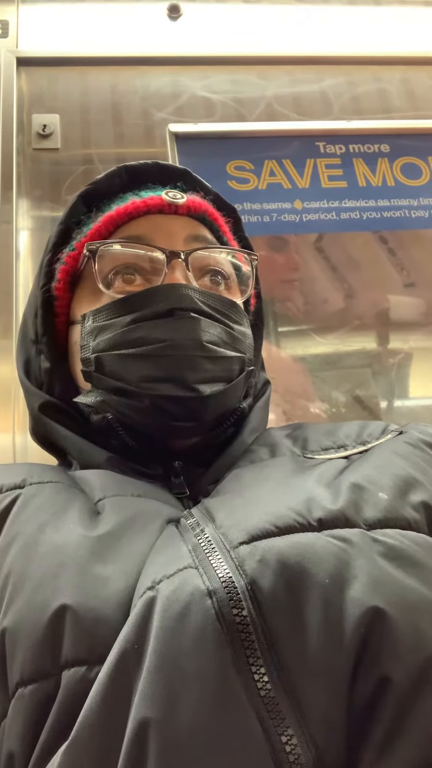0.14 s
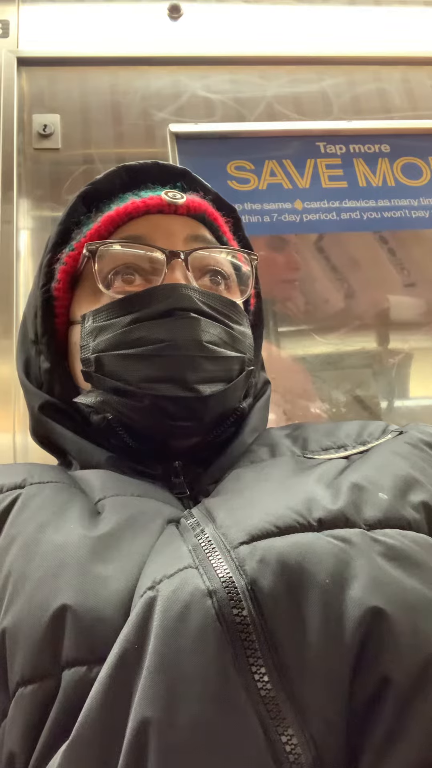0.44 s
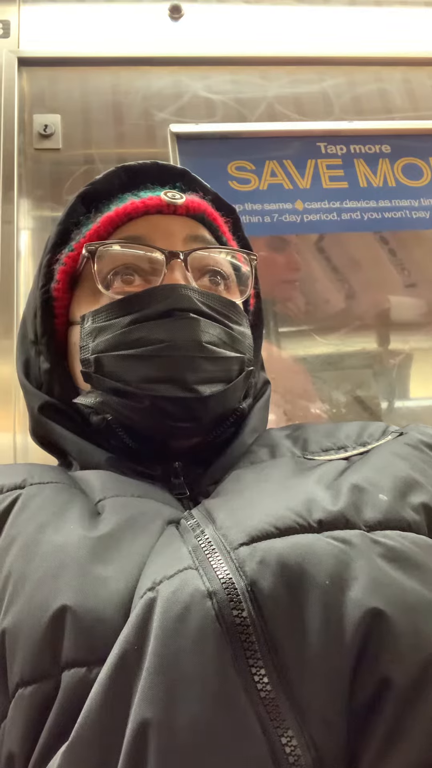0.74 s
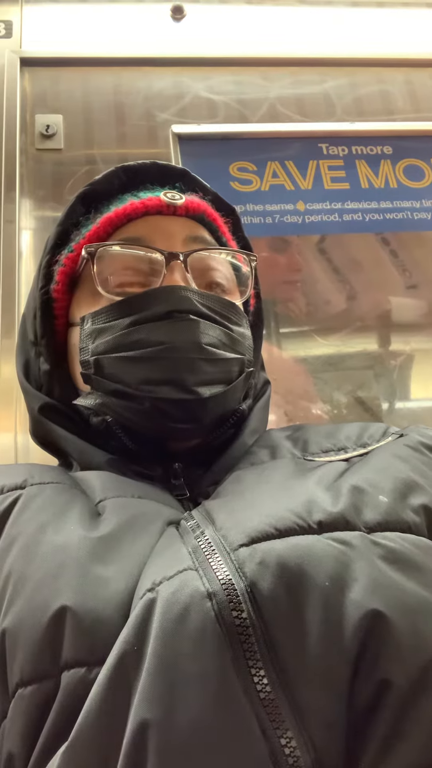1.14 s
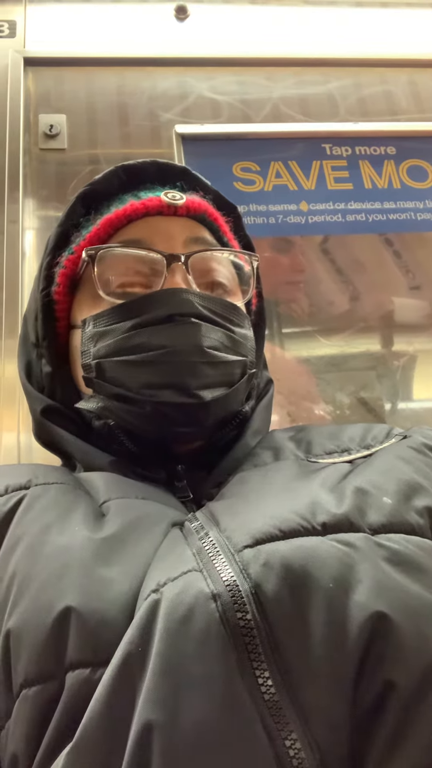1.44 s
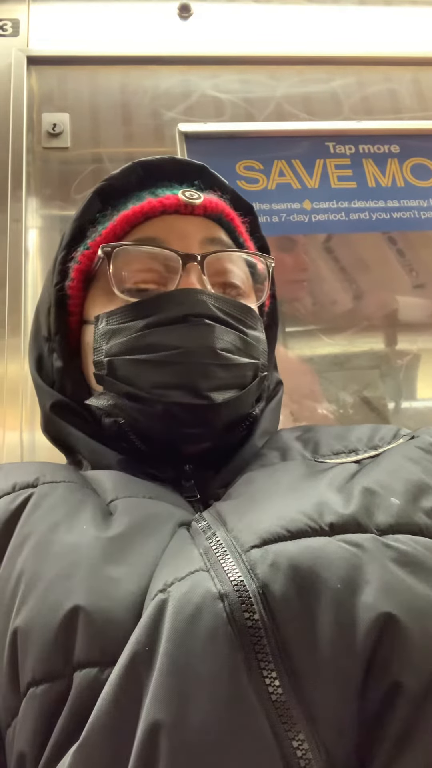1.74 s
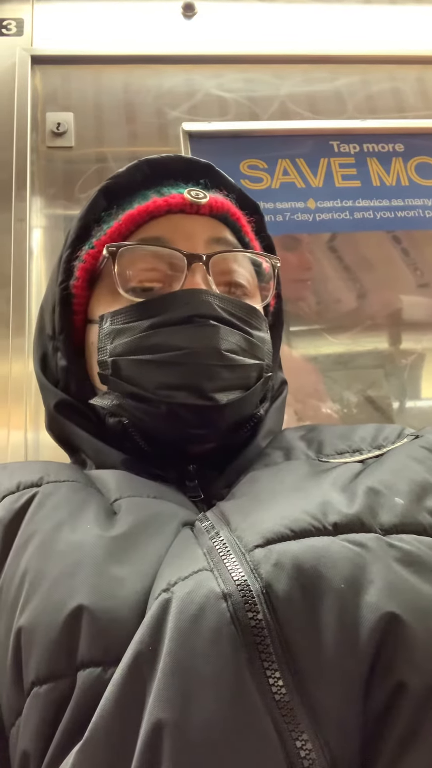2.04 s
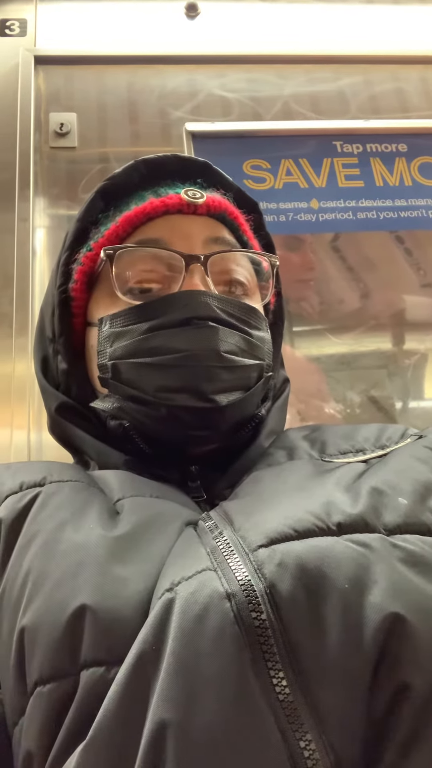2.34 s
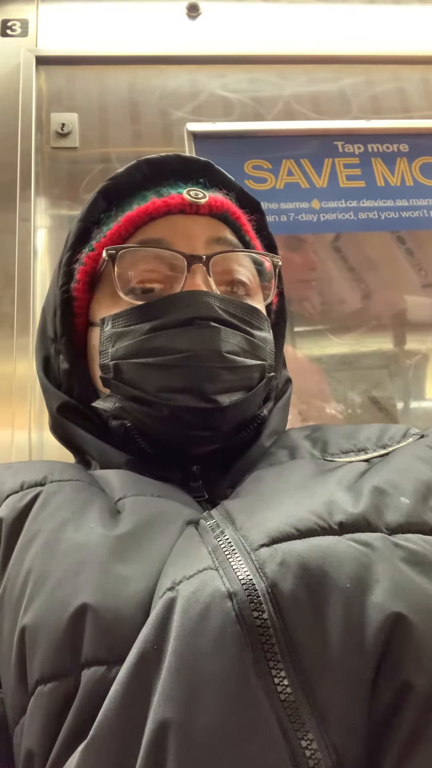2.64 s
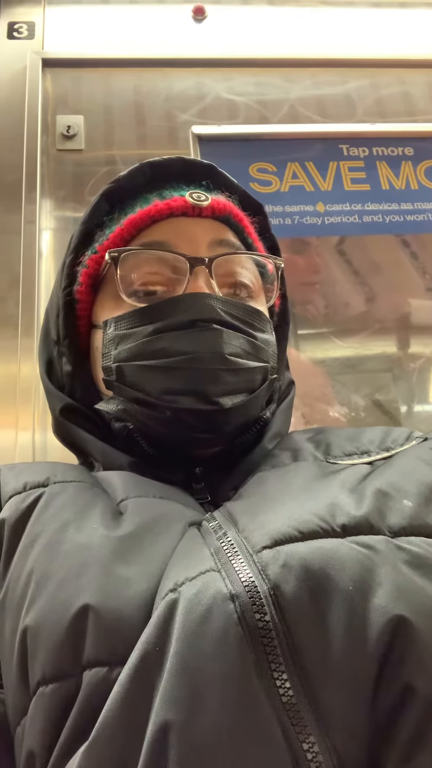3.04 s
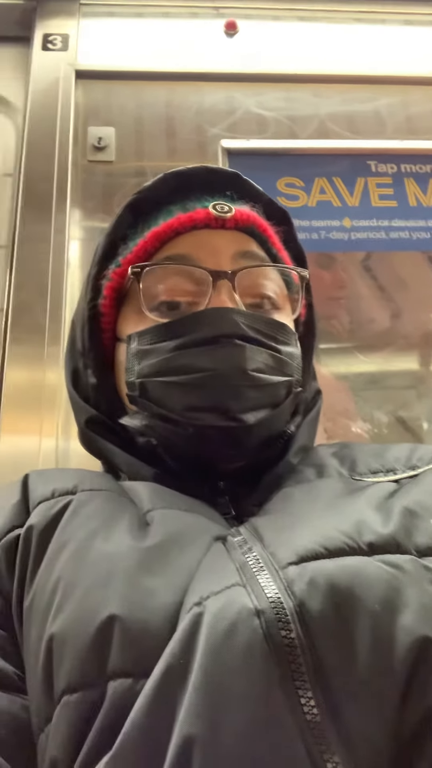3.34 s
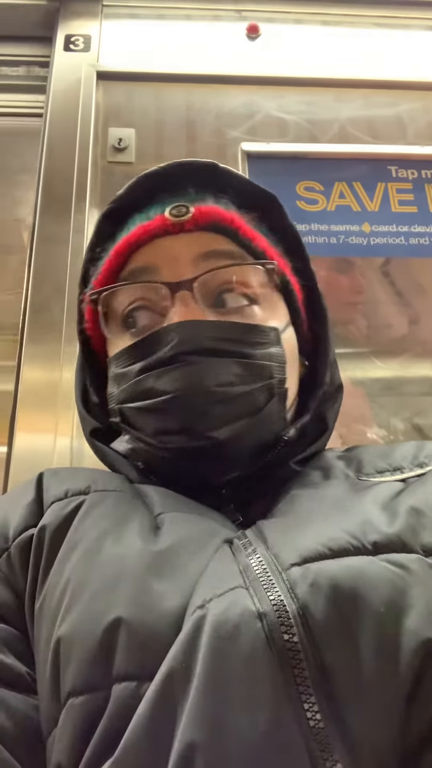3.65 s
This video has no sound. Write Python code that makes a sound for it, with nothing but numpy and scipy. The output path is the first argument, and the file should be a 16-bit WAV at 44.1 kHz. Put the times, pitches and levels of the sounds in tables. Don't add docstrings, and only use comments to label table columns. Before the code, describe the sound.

Inside a moving subway car, a phone picks up low rolling rumble, humming motor and thin whine, brief early squeals, then a sudden much louder rush with booming body blows and metallic knocks.

```python
import sys
import numpy as np
from scipy import signal
from scipy.fft import rfft, irfft, next_fast_len
from scipy.io import wavfile
from scipy.ndimage import uniform_filter1d

SR = 44100
rng = np.random.default_rng(int(sys.argv[2]) if len(sys.argv) > 2 else 0)


def volts(x):
    e = np.asarray(x, float) / 20
    return 10 ** e


def master(y):
    cut = np.clip(np.atleast_2d(y).T, -1, 1)
    pcm = np.round(cut * 32767)
    wavfile.write(sys.argv[1], SR, pcm.astype(np.int16))


N = 167580


def evened(x):
    return x / np.sqrt(np.mean(x ** 2) + 1e-20)


def read(points, hz):
    f, value = np.transpose(points)
    return np.interp(np.log(hz + 1), np.log(f + 1), value)


def curve(points):
    s, db = np.transpose(points)
    return volts(np.interp(np.arange(N) / SR, s, db, left=-140))


def add(mix, s, sound):
    part = mix[:, round(s * SR):][:, :sound.shape[-1]]
    part += sound[..., :part.shape[1]]


def slow(rate, lowest=0.326):
    t = np.arange(0, N + 64, 64) / SR
    wave = sum(np.sin(2 * np.pi * (f * t + rng.random())) / np.sqrt(f) for f in np.geomspace(lowest, rate, 16))
    return np.interp(np.arange(N) / SR, t, evened(wave))


def noise(spectrum, patch_db, size=1024):
    frames, hz = 4 * N // size + 5, np.fft.rfftfreq(size, 1 / SR)
    z = rng.standard_normal((frames, len(hz), 5)).T
    patches = uniform_filter1d(uniform_filter1d(z[4], size=14, axis=0), size=8, axis=1)
    colour = read(spectrum, hz) - 80 * (hz > 1.25 * spectrum[-1][0])
    z = (z[:2] + 1j * z[2:4]) * volts(colour[:, None] + patch_db * evened(patches))
    return evened(signal.istft(z, nperseg=size, noverlap=3 * size // 4)[1][:, :N])


def resonate(x, hz, width, passes=1):
    r = np.exp(-np.pi * width / SR)
    for _ in range(passes):
        x = 2 * signal.lfilter([1 - r], [1, -r * np.exp(2j * np.pi * hz / SR)], x).real
    return x


def ringing(push, modes):
    return sum(volts(db) * evened(resonate(push, hz, width)) for hz, width, db in modes)


def sine(turns):
    return np.sqrt(2) * np.sin(2 * np.pi * (turns + rng.random((2, 1))))


def rolling_rumble():
    # (time [s], level [dB])
    track_level = [(0, -32), (.5, -32.5), (.9, -32.5), (1.4, -32), (1.9, -32), (2.3, -33), (2.75, -32.5),
                   (3.8, -32)]
    # (frequency [Hz], density [dB per Hz])
    rumble_colour = [(25, -35.5), (60, 7.5), (95, -3), (200, -7), (800, -13.5), (1900, -21), (3000, -32.5),
                     (5200, -44)]
    swell = volts(0.53 * slow(11.0, 2.455))
    return curve(track_level) * swell * noise(rumble_colour, 1.5, size=2048)


def track_roar():
    # (time [s], level [dB])
    opening = [(2.92, -65), (2.95, -38), (3.1, -33.5), (3.16, -22), (3.24, -19.5), (3.31, -25.5),
               (3.42, -23), (3.6, -27.5), (3.73, -26), (3.8, -24.5)]
    # (frequency [Hz], density [dB per Hz])
    roar_colour = [(25, -40.5), (60, 9.5), (130, 3), (330, 1), (600, -9)]
    # (frequency [Hz], width [Hz], level [dB])
    body_modes = [(55, 8, -19.5), (100, 25, -13.5), (151, 14, -14), (220, 36, -4), (272, 21, -12.5),
                  (330.5, 45, -18)]
    roar = noise(roar_colour, 1.9)
    return curve(opening) * (roar + ringing(roar, body_modes))


def wheel_rush():
    # (time [s], level [dB])
    rush_level = [(2.91, -65), (2.93, -39), (3.121, -34), (3.127, -24.5), (3.16, -23), (3.29, -26.5),
                  (3.47, -27.5), (3.57, -30), (3.65, -28.5), (3.745, -30), (3.8, -22.5)]
    # (frequency [Hz], density [dB per Hz])
    rush_colour = [(250, -1.5), (600, 2), (1100, -1), (1800, -8.5), (3500, -19.5), (6000, -32.5)]
    # (frequency [Hz], width [Hz], level [dB])
    panel_modes = [(445, 18, -15), (604, 58, -12.5), (696, 13, -24), (784, 4.1, -17.5), (1050, 30, -24)]
    rush = noise(rush_colour, 1.2)
    flutter = volts(0.49 * slow(40, 8))
    return curve(rush_level) * flutter * (rush + ringing(rush, panel_modes))


def body_blows():
    # (time [s], first pitch [Hz], last pitch [Hz], level [dB], swell length [s])
    blows = [(1.297, 77.4, 76, -29.5, .12), (1.679, 55, 55, -31, .1), (1.706, 76.8, 81.6, -30.5, 0.081),
             (2.94, 189, 184, -36.5, 0.033), (3.01, 205, 205, -30, 0.05), (3.036, 276, 277, -29.5, 0.047),
             (3.079, 105.7, 100.3, -24, 0.038), (3.129, 78.5, 106, -14.5, 0.085),
             (3.183, 196, 194, -22, 0.037), (3.19, 333.7, 338, -22.5, 0.03), (3.236, 214, 229, -27, 0.028),
             (3.265, 110, 103, -18, .035), (3.264, 279, 275, -23, 0.038), (3.315, 274.4, 272, -17.5, 0.04),
             (3.318, 82, 77, -23, 0.053), (3.386, 107.7, 81.8, -17, 0.04), (3.455, 218, 228, -20.5, 0.031),
             (3.485, 152, 161, -24, 0.05), (3.488, 68, 61.6, -22.5, 0.04), (3.535, 100, 107, -19.5, .03),
             (3.54, 210.6, 222, -20.5, 0.035), (3.596, 220, 218, -21.5, 0.048),
             (3.595, 334.3, 325.5, -27.5, 0.054), (3.602, 92.4, 95, -28.5, 0.045),
             (3.674, 277, 274, -25.5, 0.025), (3.75, 107.5, 110, -29.5, 0.024)]
    out = np.zeros((2, N))
    for start, hz, end_hz, db, length in blows:
        t = np.arange(0, 1.85 * length, 1 / SR)
        swell = np.sin(np.pi * (t / t[-1]) ** 0.89) ** 1.3
        turns = hz * t + .5 * (end_hz - hz) * t ** 2 / t[-1]
        add(out, start, volts(db) * swell * sine(turns))
    return out


def clanks():
    # (time [s], level [dB], centre [Hz])
    knocks = [
        (3.125, -26, 736),
        (3.143, -25.5, 810),
        (3.135, -33, 2400),
        (3.341, -38, 4800),
        (3.486, -25, 846),
        (3.582, -36, 650),
        (3.631, -33.5, 590),
        (3.759, -27, 657),
    ]
    t60_s, attack_s = 0.072, 0.0022
    out = np.zeros((2, N))
    for start, db, hz in knocks:
        t = np.arange(0, .15, 1 / SR)
        crack = resonate(rng.standard_normal((2, len(t))), hz, 1.6 * hz, passes=3)
        add(out, start, volts(db - 60 * t / t60_s) * np.minimum(t / attack_s, 1) * evened(crack))
    return out


def seal_hiss():
    # (time [s], level [dB])
    gap_level = [(2.897, -90), (2.915, -41), (2.96, -38.5), (3.03, -45), (3.11, -45), (3.15, -41),
                 (3.3, -48.5), (3.345, -40.5), (3.44, -47.5), (3.8, -51)]
    # (frequency [Hz], density [dB per Hz])
    hiss_colour = [(600, -27.5), (1250, 7), (2500, -15.5), (4200, -3), (6000, -8), (7500, -12.5),
                   (8600, -11.5)]
    # (time [s], level [dB])
    jet_level = [(2.897, -91), (2.917, -48), (2.96, -49.5), (3.01, -59), (3.05, -52.5), (3.09, -59.5),
                 (3.19, -59.5), (3.21, -51), (3.29, -57.5), (3.33, -53), (3.4, -57.5), (3.53, -52),
                 (3.8, -53.5)]
    # (frequency [Hz], density [dB per Hz])
    jet_colour = [(8000, -30), (9000, 0), (12000, 0), (13500, -1), (14700, -4), (15500, -8), (16000, -30)]
    hiss = curve(gap_level) * volts(1.3 * slow(33, 6)) * noise(hiss_colour, 1.8, size=512)
    return hiss + curve(jet_level) * noise(jet_colour, 2.2, size=512)


def air_spit():
    # time [s], length [s], centre [Hz], level [dB]
    start, length, hz, db = (3.296, .042, 10000, -57)
    out, t = np.zeros((2, N)), np.arange(0, length, 1 / SR)
    puff = resonate(rng.standard_normal(len(t)), hz, .3 * hz, passes=2)
    add(out, start, volts(db) * np.sqrt(np.sin(np.pi * t / length)) * evened(puff))
    return out


def wheel_squeals():
    # (time [s], length [s], pitch [Hz], level [dB])
    squeals = [(.005, .1, 4800, -57), (.04, .06, 4880, -60), (.09, .06, 4780, -61), (.15, .03, 4790, -59),
               (.2, .05, 4810, -63), (.005, .04, 4330, -57), (.035, .125, 4290, -59), (.26, .14, 4780, -67),
               (.465, .04, 4550, -61), (.51, .05, 4400, -59), (.52, .08, 4500, -61), (.605, .04, 4450, -53),
               (.625, .06, 4400, -54), (.635, .04, 4500, -56), (.67, .08, 4410, -63),
               (.735, .09, 4420, -60), (.72, .04, 4780, -64), (.915, .035, 3770, -58),
               (.96, .045, 4100, -58), (1.02, .04, 4550, -63), (1.06, .105, 4548, -54),
               (1.178, .035, 4565, -54), (1.213, .045, 4585, -50), (1.28, .07, 4545, -59),
               (1.355, .04, 4580, -58), (1.44, .06, 4650, -63)]
    width_hz, tone_share, flutter_db, flutter_hz = 45, .72, 1.5, 38
    out = np.zeros((2, N))
    for start, length, hz, db in squeals:
        t = np.arange(0, length, 1 / SR)
        fuzz = resonate(rng.standard_normal((2, len(t))), hz, width_hz)
        fuzz = evened(resonate(fuzz, hz, 4 * width_hz))
        flutter = flutter_db * np.sin(2 * np.pi * (flutter_hz * t + rng.random()))
        swell = np.sqrt(np.sin(np.pi * t / length))
        squeal = tone_share * sine(hz * t) + (1 - tone_share) * fuzz
        add(out, start, volts(db + flutter) * swell * squeal)
    return out


def motor_hum():
    # (multiple, level [dB rms], wander [dB])
    orders = [(1, -60, 1.2), (2, -43.5, 2.8), (3, -43, 2.9), (4, -39, 0.28), (5, -47, 4.8), (10, -37, 1.94),
              (18, -77, 2.2)]
    shaft_hz = 26.99
    turns = np.cumsum(shaft_hz * (1 + 0.0036 * slow(6))) / SR
    return sum(volts(db + wander_db * slow(12, 1.444)) * sine(k * turns) for k, db, wander_db in orders)


def inverter_whine():
    # (frequency [Hz], level [dB rms])
    whine_lines = [(690, -58), (1104, -61), (1421, -61), (1820, -60), (2051, -63), (5620, -78), (5739, -68),
                   (5857, -74), (5981, -69.5), (8608, -76), (8969, -78)]
    t = np.arange(N) / SR
    return sum(volts(db + 3.8 * slow(40)) * sine(hz * t + 0.25 / (2 * np.pi) * slow(12))
               for hz, db in whine_lines)


def far_rattles():
    # (time [s], length [s], centre [Hz], level [dB])
    rattles = [
        (.915, .1, 2600, -49),
        (1.2, .08, 3000, -55),
        (1.84, .12, 1900, -46),
        (2.29, .07, 4700, -59),
        (1.7, .16, 13500, -76),
    ]
    out = np.zeros((2, N))
    for start, length, hz, db in rattles:
        t = np.arange(0, length, 1 / SR)
        band = resonate(rng.standard_normal((2, len(t))), hz, 0.64 * hz, passes=3)
        add(out, start, volts(db) * np.sin(np.pi * (t / length) ** 0.79) * evened(band))
    return out


def cabin_air():
    # (time [s], level [dB])
    air_level = [(0, -66), (.7, -69.5), (.85, -61.5), (1.5, -65.5), (1.78, -64), (2.2, -67), (2.33, -64),
                 (2.7, -67.5), (2.85, -67), (3.8, -85.5)]
    # (frequency [Hz], density [dB per Hz])
    air_colour = [(3000, -15), (4500, -2), (6100, -10), (7400, -7.5), (9300, -12), (12500, -7),
                  (14900, -25), (15400, -57)]
    return curve(air_level) * noise(air_colour, 2.5)


def notch(hz, low, high, size):
    return uniform_filter1d(1. * (hz > low) * (hz < high), size=size)


def two_ports(wide, lines, hz):
    # (frequency [Hz], level [dB])
    side_level = [(60, -22), (150, -14.5), (300, -11.5), (520, -3.5), (1800, -1.5), (4500, 5.5), (6600, 4),
                  (12000, 2)]
    # (frequency [Hz], likeness [0-1])
    likeness = [(60, 0.71), (300, 0.89), (500, 0.64), (1800, 0.71), (2700, .64), (5000, .18), (7000, .6),
                (12000, .4)]
    # (frequency [Hz], phase [radians])
    side_phase = [(60, .08), (300, -0.29), (750, -0.91), (1500, -1.57), (8300, -1.1), (11000, 1.55)]
    here, twin = wide + lines
    like = np.clip(read(likeness, hz), 0, 1)
    side = like * np.exp(1j * read(side_phase, hz)) * here + np.sqrt(1 - like ** 2) * twin
    side = side * volts(read(side_level, hz)) * volts(-45 * notch(hz, 13000, np.inf, 800))
    null = notch(hz, 8300, 11600, 400)
    mid = wide[0] * volts(-30 * null) + lines[0] * volts(-10 * null)
    return np.array([mid + side, mid - side])


def scene():
    size = next_fast_len(N + 4096)
    hz = np.fft.rfftfreq(size, 1 / SR)
    dip = volts(-4 * notch(hz, 4850, 5300, 800))
    rolling = rfft(rolling_rumble() + cabin_air(), size) * dip
    door = track_roar() + wheel_rush() + seal_hiss()
    bursts = body_blows() + clanks() + wheel_squeals() + far_rattles()
    wide = rolling + rfft(door + bursts, size)
    lines = rfft(motor_hum() + inverter_whine(), size)
    return irfft(two_ports(wide, lines, hz), size)[:, :N] + air_spit()


def low_pass(x):
    return signal.sosfilt(signal.butter(12, 16030, fs=SR, output="sos"), x)


def record(dry):
    return low_pass(dry)


dry = scene()
out = record(dry)
master(out)
```